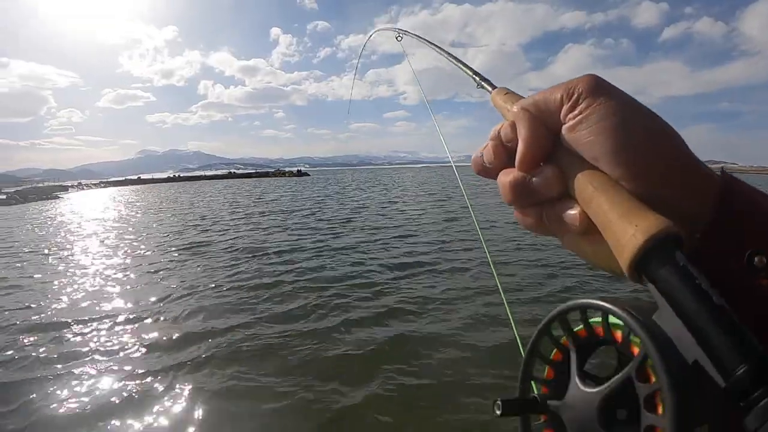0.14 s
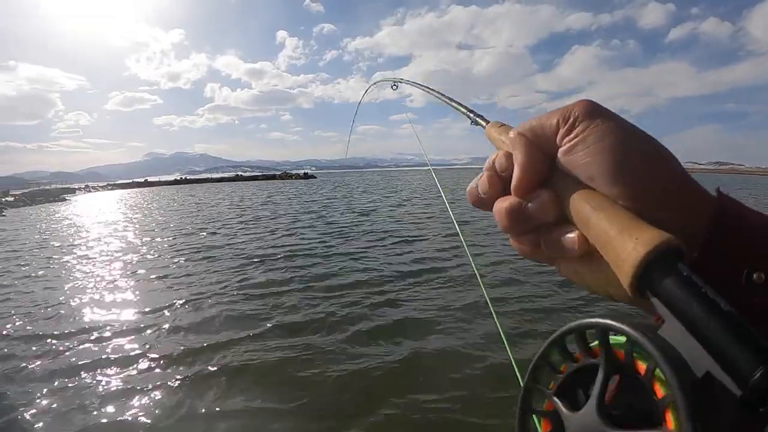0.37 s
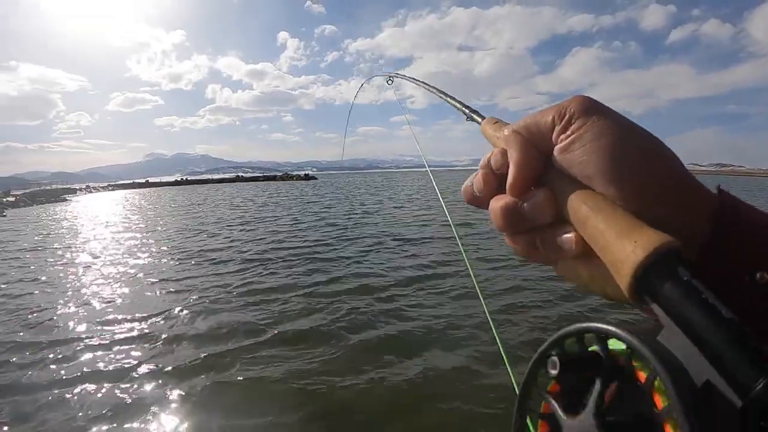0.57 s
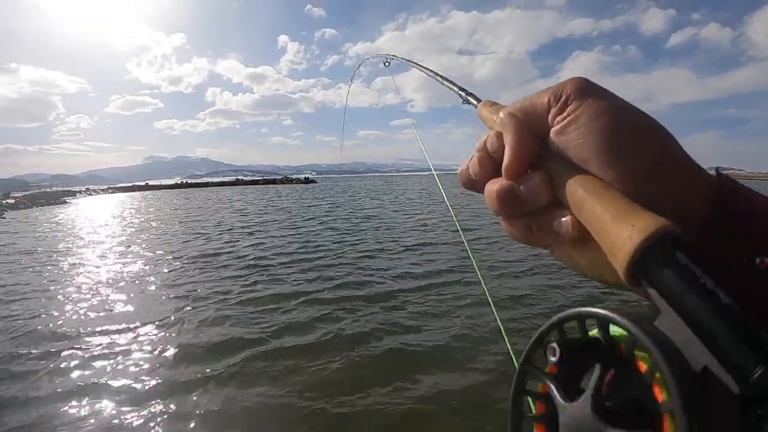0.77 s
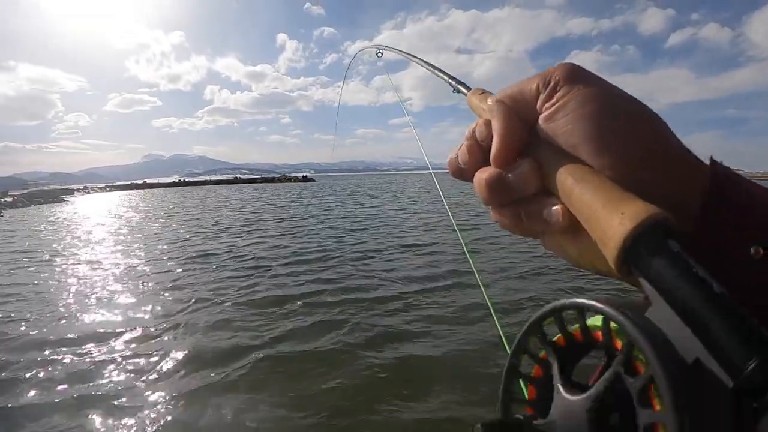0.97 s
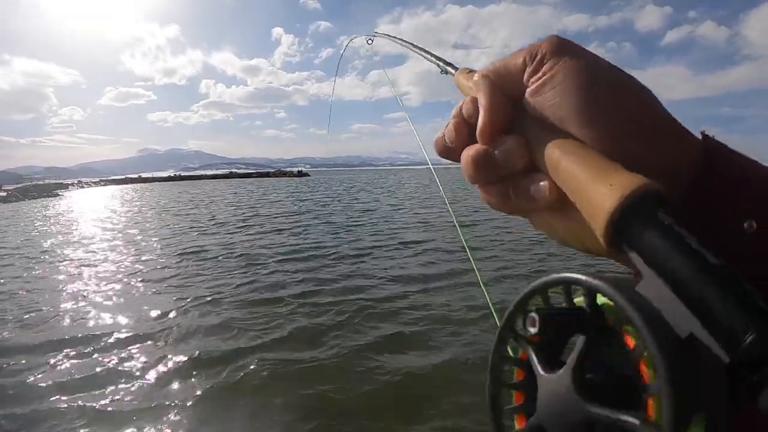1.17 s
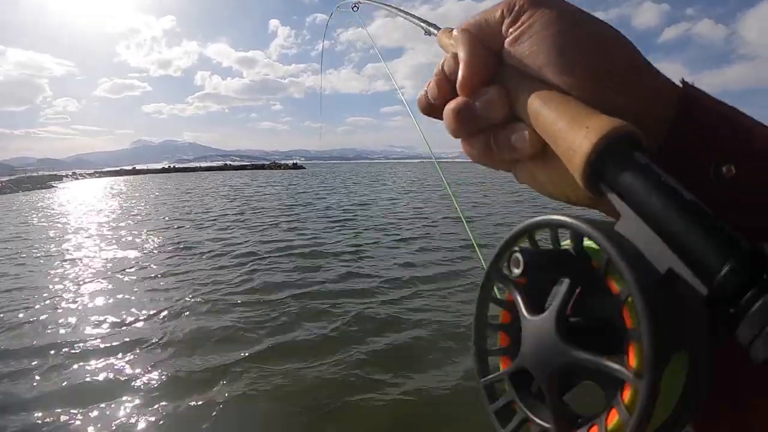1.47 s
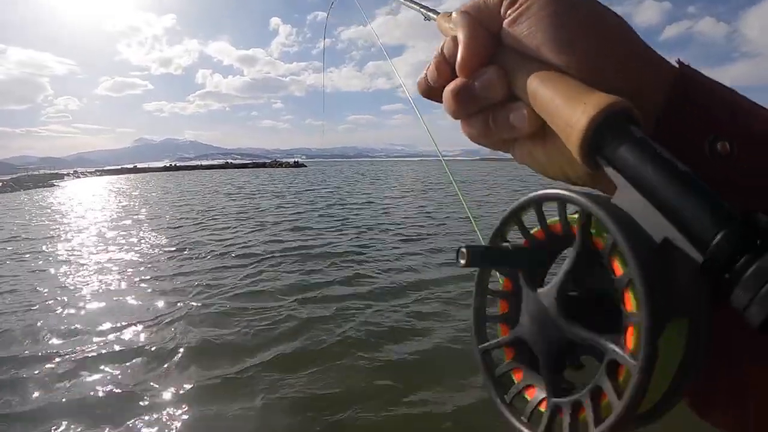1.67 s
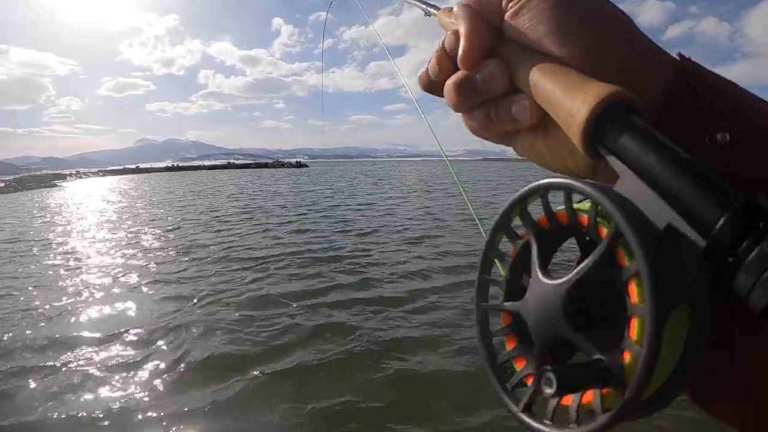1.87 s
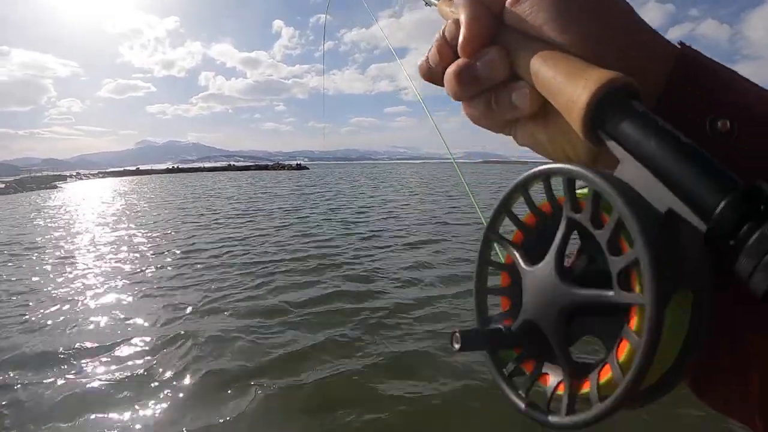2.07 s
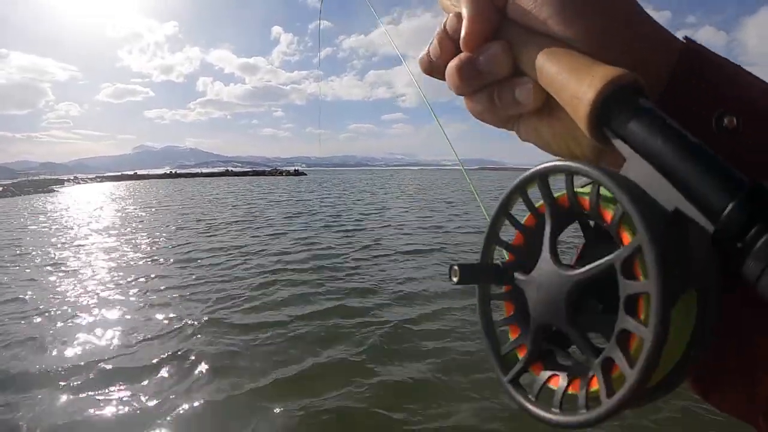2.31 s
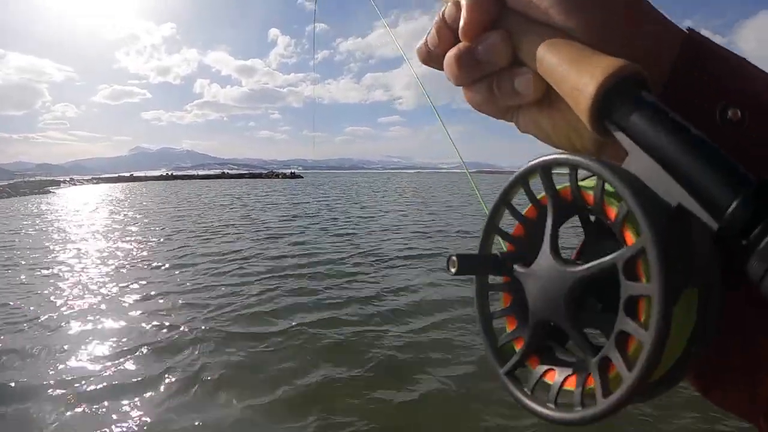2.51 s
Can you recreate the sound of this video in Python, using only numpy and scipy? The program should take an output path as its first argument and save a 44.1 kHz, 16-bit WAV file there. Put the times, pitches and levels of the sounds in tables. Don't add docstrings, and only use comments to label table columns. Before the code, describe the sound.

A fly reel ratchets close to the microphone: a few separate clicks, then a fast, surging metallic buzz that slows into spaced clicks and stops, with low wind buffeting and very faint lapping water outdoors.

```python
import sys
import numpy as np
from scipy import signal
from scipy.fft import rfft, irfft, next_fast_len
from scipy.io import wavfile
from scipy.ndimage import map_coordinates

SR = 44100
rng = np.random.default_rng(int(sys.argv[2]) if len(sys.argv) > 2 else 0)


def waveform_to_disk(signal):
    frames = np.transpose(np.atleast_2d(signal))
    scaled = np.clip(frames, -1, 1) * 32767
    samples = np.round(scaled).astype(np.int16)
    wavfile.write(sys.argv[1], SR, samples)


def voltage_ratio(level):
    return 10 ** (np.asarray(level, float) / 20)


N = 116865

# t/s, level/dB
WIND = [(0.0, -35.5), (0.44, -32), (0.46, -36), (0.73, -34), (0.82, -36.5), (1.0, -30), (1.05, -37.5),
        (1.09, -27.5), (1.19, -35.5), (1.44, -31), (1.53, -35), (2.49, -32), (2.5, -38.5), (2.65, -32)]
# f/Hz, level/dB per Hz
RUMBLE = [(13, -56), (22, -10), (176, -1), (433, -14), (477, -16), (631, -20), (889, -30.5), (965, -45.5),
          (1100, -41), (1430, -77.5), (2420, -120)]
# f/Hz, level/dB per Hz
WHOOSH = [(300, -41), (480, 1), (650, 0), (900, -9), (1300, -46)]
# f/Hz, level/dB per Hz
LAKE = [(410, -72), (700, -14.5), (977, 2), (1410, -5.5), (1710, 1), (6310, -64), (12000, -59),
        (15600, -85), (22000, -120)]
# t/s, rate/teeth per s
RUN_SPEED = [(.3913, 77.4), (.422, 155.2), (.491, 232.4), (.558, 176.3), (.635, 361.4), (.71, 384.8),
             (.776, 302.4), (.868, 423.9), (.966, 253.9), (1.059, 341.1), (1.154, 197.2), (1.238, 278.3),
             (1.342, 221.4), (1.411, 254.1), (1.51, 265.6), (1.585, 203.9), (1.653, 181), (1.748, 119.6)]
# t/s, rate/teeth per s
COAST_SPEED = [(1.756, 104.33), (1.7992, 105.89), (1.8592, 88.17), (1.9192, 77.13), (1.9892, 69.63),
               (2.0592, 57.15), (2.1292, 52.22), (2.1892, 49.64), (2.2442, 38.44)]
# f/Hz, level/dB per Hz
METAL = [(530, -75.5), (900, -36), (2870, -9), (3690, -11.5), (5750, -16.5), (7750, -26), (9060, -36),
         (10800, -28.5), (15700, -78)]
# t/s, length/s, start f/Hz, end f/Hz, level/dB
SQUEAKS = [
    (.083, 0.014, 4370, 4640, -42),
    (0.113, .014, 4700, 4900, -48),
    (1.88, .14, 10160, 10300, -52),
]
# t/s, level/dB, brightness/dB
SINGLE_CLICKS = [(.099, -14, 3.5), (.151, -12, 3), (.1991, -14, 5), (.2261, -16, 5), (.2459, -15.5, 5),
                 (.263, -26, -2), (.2801, -15.5, 1), (.2966, -13.5, -6), (.3182, -10.5, -3.5),
                 (.3685, -9.5, -3.5), (2.262, -27, 6), (2.2693, -17.5, 6), (2.311, -19, 6.5),
                 (2.3757, -15.5, 4), (2.408, -41, -7.5), (2.418, -49.5, -0.5), (2.477, -50.5, 4.5)]
# t/s, level/dB
RUN_FORCE = [(.39, -12.5), (.5, -12.5), (.6, -12), (.8, -13.5), (1.0, -13.5), (1.2, -12.5), (1.45, -12.5),
             (1.68, -12.5), (1.75, -10)]
# t/s, level/dB
COAST_FORCE = [(1.756, -11), (1.86, -10.5), (1.98, -9.5), (2.06, -9.5), (2.15, -12.5), (2.2, -11),
               (2.24, -14)]
# f/Hz, level/dB, t60/s
MODES = [(1565, -29.5, 0.014), (2650, -32.5, 0.01), (3320, -9, 0.02), (3698, -3, 0.027),
         (3589, 2.5, 0.0091), (4170, -8, 0.024), (4646, -11.5, 0.016), (5020, -20.5, 0.014),
         (6130, -30.5, 0.023), (7260, -12, 0.0066), (7726, -12.5, 0.011), (10420, -31, 0.019),
         (10740, -21.5, 0.01), (13500, -32, .006)]
# once-a-turn level/dB, phase/rad, twice-a-turn level/dB, phase/rad
LOBES = [(4.5, -0.6, 4, 3), (2.5, 0.5, 5.5, -1.1), (-0.4, -0.5, -2.5, -1.8), (0.5, 6, 3, -1.48),
         (1.1, -3.5, 4.5, -1.5), (1.2, 2.9, 1, -0.4), (2.4, 3.5, 1, .9), (4, -0.5, 7, 0), (0.5, 0.5, 4, -5),
         (3, 1.5, 4, -2.5), (2.5, 3.5, 2.5, -0.7), (-12, -5, -1.8, 8), (4, 7.8, 3, -3),
         (-2.5, -3, -1, -5.5)]
# t/s, length/s, f/Hz, level/dB
SWELLS = [
    (1.875, .085, 6200, 15),
    (1.95, .07, 10200, 1),
    (2.13, .04, 4200, 6),
    (2.0, .25, 7780, -6),
    (.22, .18, 4200, -6),
    (.22, .18, 3350, -5),
    (2.35, .1, 6200, 8),
    (2.35, .1, 5100, 6),
    (2.33, .1, 3350, 5),
]
# f/Hz, side under mid/dB
SIDE = [(60, -43), (300, -39.5), (1000, -22.5), (4000, -40), (8000, -38.5), (13000, -4)]


def unit(x):
    return x / np.sqrt(np.mean(x ** 2) + 1e-20)


def along(points, hz):
    f, value = np.transpose(points)
    return np.interp(np.log(hz + 1), np.log(f + 1), value)


def wobble(rate):
    knots = rng.standard_normal(int(N * rate / SR) + 4)
    return map_coordinates(knots, [np.arange(N) * rate / SR])


def filtered(x, response):
    m = next_fast_len(N + 8192)
    return irfft(rfft(x, m) * response(np.fft.rfftfreq(m, 1 / SR)), m)[..., :N]


def noise(colour):
    return unit(filtered(rng.standard_normal(N), lambda hz: voltage_ratio(along(colour, hz))))


def lay(starts, shapes):
    at = (starts * SR).astype(int)[:, None] + np.arange(shapes.shape[1])
    return np.bincount(at.ravel(), shapes.ravel(), N + SR)[:N]


def wind():
    gust_s, gust_length_s, gust_db = 1.87, 0.07, -42
    t = np.arange(N) / SR
    strength_db = np.interp(t, *np.transpose(WIND))
    buffeting = voltage_ratio(strength_db) * unit(voltage_ratio(0.83 * wobble(24.99)) * noise(RUMBLE))
    gust = np.exp(-((t - gust_s) / gust_length_s) ** 2) * noise(WHOOSH)
    return buffeting + voltage_ratio(gust_db) * gust


def lake():
    wash_db, lap_db, lap_spread_db, laps_per_s = -55, -61, 4, 60
    luck = rng.standard_normal((round(laps_per_s * N / SR), 2))
    hz = 1700 * np.exp(0.52 * luck[:, :1])
    t = np.arange(700) / SR
    envelope = np.exp(-t * hz / 5) * (1 - np.exp(-t * 1500))
    rising_tone = np.sin(2 * np.pi * hz * t * (1 + 8 * t))
    bubbles = voltage_ratio(lap_spread_db * luck[:, 1:]) * rising_tone * envelope
    wash = voltage_ratio(wash_db + 2.5 * wobble(10.76)) * noise(LAKE)
    return wash + voltage_ratio(lap_db) * lay(rng.uniform(0, N / SR, len(hz)), bubbles)


def spool_speed(rows):
    s, rate = np.transpose(rows)
    t = np.arange(s[0], s[-1], 1 / SR)
    place = np.interp(t, s, np.arange(len(s)))
    return t, np.exp(map_coordinates(np.log(rate), [place], mode="nearest"))


def drag():
    rub_db, rub_growth = -35, 0.51
    t = np.arange(N) / SR
    run_t, run_rate = spool_speed(RUN_SPEED)
    coast_t, coast_rate = spool_speed(COAST_SPEED)
    times = np.r_[0, .17, .25, .35, run_t, coast_t, 2.3, 2.42]
    rate = np.interp(t, times, np.r_[1, 5, 150, 12, run_rate, coast_rate, 8, .3])
    grain = unit(voltage_ratio(2.46 * wobble(600)) * noise(METAL))
    out = voltage_ratio(rub_db + 3.2 * wobble(39.16)) * (rate / 200) ** rub_growth * grain
    for start, length, hz0, hz1, db in SQUEAKS:
        u = np.clip((t - start) / length, 0, 1)
        cycles = np.cumsum(hz0 + (hz1 - hz0) * u + 40 * wobble(300)) / SR
        swell = voltage_ratio(db + 9 * wobble(90)) * np.sin(np.pi * u ** 2.3)
        out = out + swell * np.sin(2 * np.pi * cycles)
    return out


def teeth(rows, force):
    t, rate = spool_speed(rows)
    turned = np.cumsum(rate) / SR
    s = np.interp(np.arange(int(turned[-1]) + 1), turned, t)
    return np.c_[s, np.interp(s, *np.transpose(force)), 0 * s]


def pawl():
    teeth_per_turn, coast_first_tooth = 35.9, 353
    scatter_db, mode_scatter_db, detune, jitter_s = .7, 1.6, .003, 8e-6
    drift_teeth, drift_db, wander = 4, 1.6, .007
    bright_hz, rise_s = 4900, .0007
    crack_db, crack_t60, fresh = -2, 0.0044, .3

    run, coast = teeth(RUN_SPEED, RUN_FORCE), teeth(COAST_SPEED, COAST_FORCE)
    s, size_db, bright_db = np.vstack([SINGLE_CLICKS, run, coast]).T
    no_tooth = np.full(len(SINGLE_CLICKS), np.nan)
    tooth = np.r_[no_tooth, np.arange(len(run)), coast_first_tooth + np.arange(len(coast))]
    hz, db, t60 = np.transpose(MODES)
    luck = rng.standard_normal((len(s), 2))
    slow, fast, tune = rng.standard_normal((3, len(s), len(hz)))

    once_db, once, twice_db, twice = np.transpose(LOBES)
    angle = 2 * np.pi * tooth[:, None] / teeth_per_turn
    beam = np.nan_to_num(once_db * np.cos(angle + once) + twice_db * np.cos(2 * angle + twice))
    place = np.arange(len(s)) / drift_teeth
    drift = np.transpose([map_coordinates(d, [place]) for d in slow.T])
    level = db + beam + drift_db * drift + mode_scatter_db * fast + bright_db[:, None] * (hz > bright_hz)
    for at, length, mode_hz, swell_db in SWELLS:
        level[:, np.argmin(abs(hz - mode_hz))] += swell_db * np.exp(-((s - at) / length) ** 4)

    s = s + jitter_s * luck[:, 0]
    t = (np.arange(900)[None] + 1 - (s * SR % 1)[:, None]) / SR
    ring = 0
    for k in range(len(hz)):
        pitch = hz[k] * (1 + detune * tune[:, [k]] + wander * drift[:, [-1 - k]])
        ring = ring + voltage_ratio(level[:, [k]] - 60 * t / t60[k]) * np.sin(2 * np.pi * pitch * t)
    gain = voltage_ratio(size_db + scatter_db * luck[:, 1])[:, None] * (1 - np.exp(-t / rise_s))

    shared_burst = map_coordinates(rng.standard_normal(905), [t * SR])
    burst = shared_burst + fresh * rng.standard_normal(t.shape)
    crack_level = bright_db[:, None] + 0.54 * beam[:, [3]] - 60 * t / crack_t60
    crack = lay(s, gain * voltage_ratio(crack_level) * burst)
    coloured_crack = filtered(crack, lambda f: voltage_ratio(along(METAL, f) * 0.51))
    return lay(s, gain * ring) + voltage_ratio(crack_db) * coloured_crack


def scene():
    mid = wind() + lake() + drag() + pawl()

    def port_difference(hz):
        phase = np.cumsum(rng.standard_normal(len(hz)))
        return voltage_ratio(along(SIDE, hz)) * np.exp(.6j * phase)

    side = filtered(mid, port_difference)
    return np.array([mid + side, mid - side])


def roll_off(x):
    return signal.sosfilt(signal.butter(12, 15850, fs=SR, output="sos"), x)


def record(dry):
    notch_hz, notch_width_hz, low_cut_hz, top_hz = 8950, 520, 48, 15900

    def housing(hz):
        off_tune = notch_hz ** 2 - hz ** 2
        notch = (off_tune + 30j * hz) / (off_tune + 1j * hz * notch_width_hz)
        low_cut = hz ** 3 / (hz ** 3 + low_cut_hz ** 3)
        return notch * (hz < top_hz) * low_cut

    mix = filtered(dry, housing)
    return roll_off(mix)


dry = scene()
out = record(dry)
waveform_to_disk(out)
```